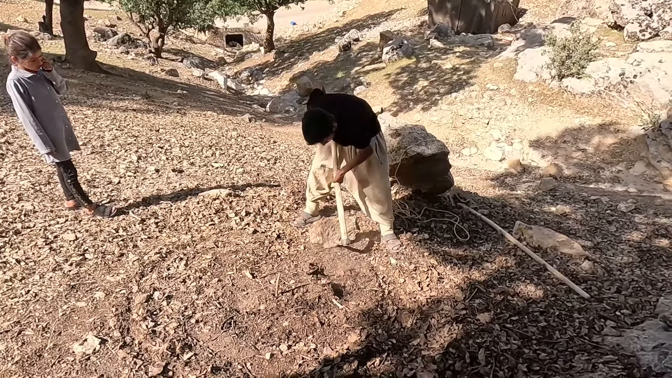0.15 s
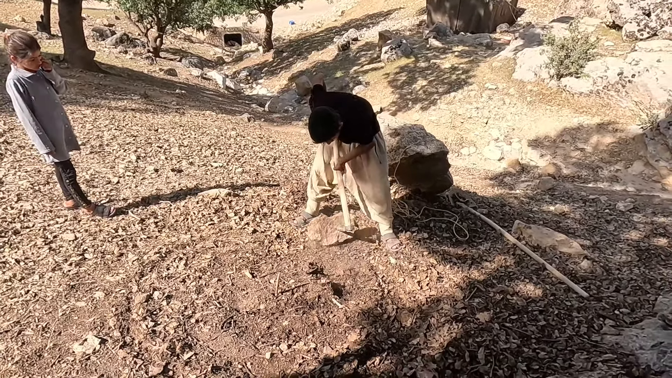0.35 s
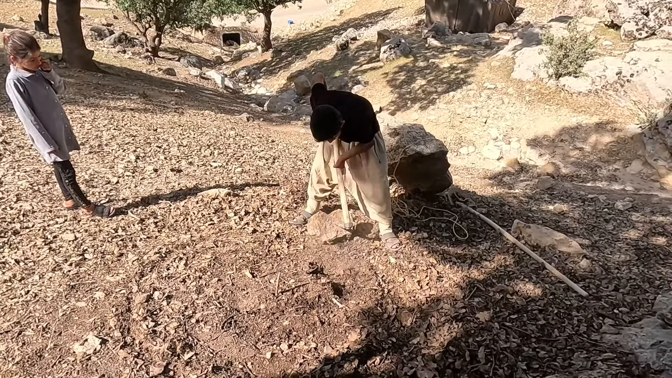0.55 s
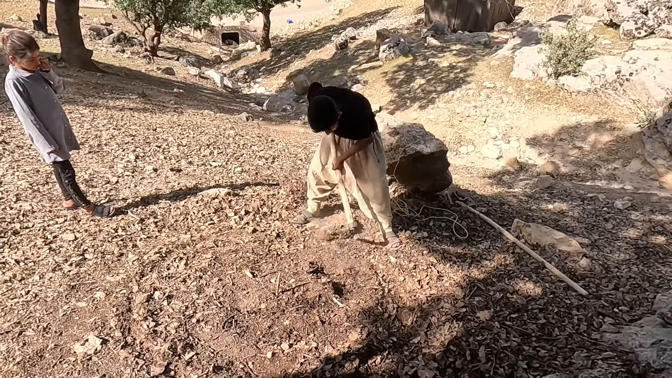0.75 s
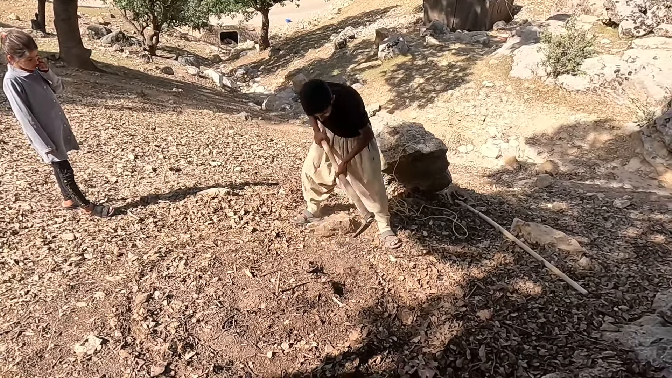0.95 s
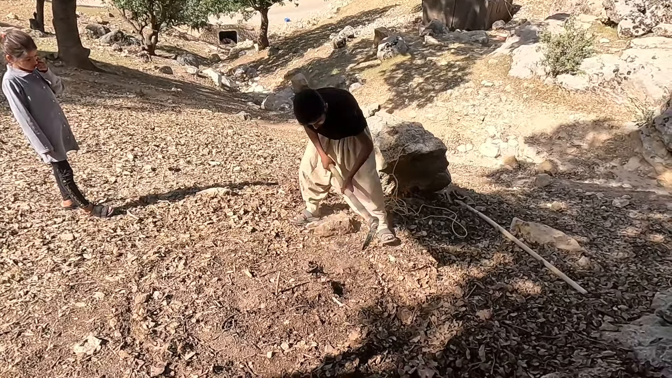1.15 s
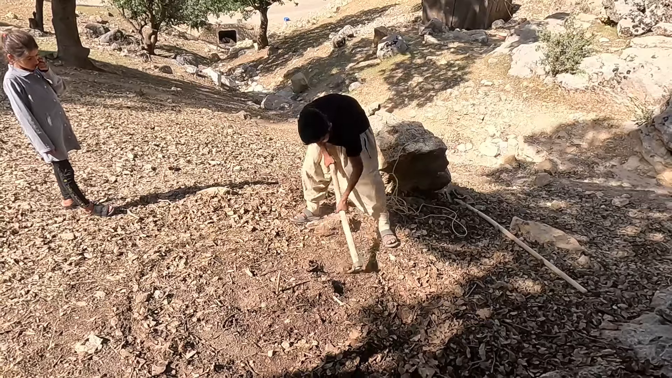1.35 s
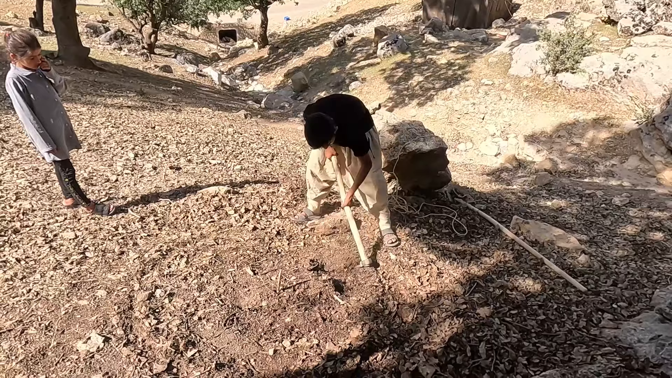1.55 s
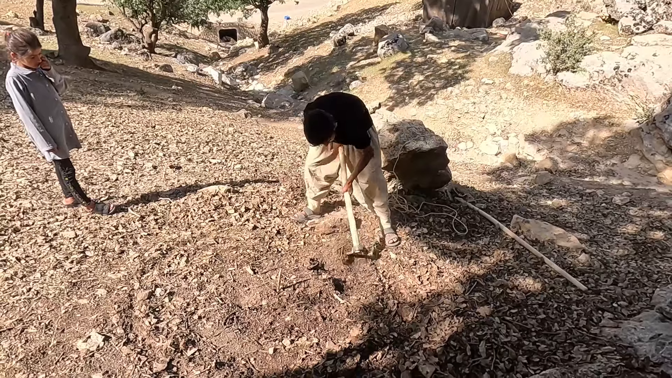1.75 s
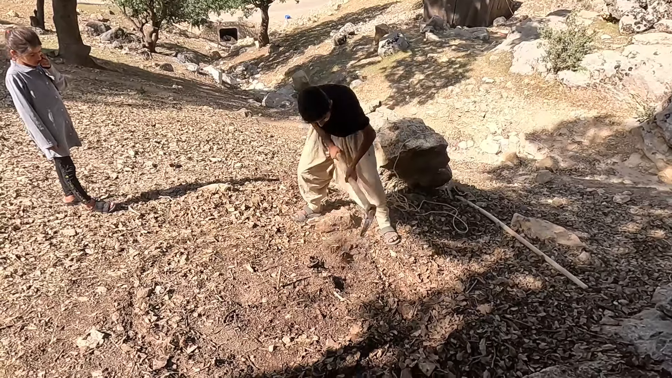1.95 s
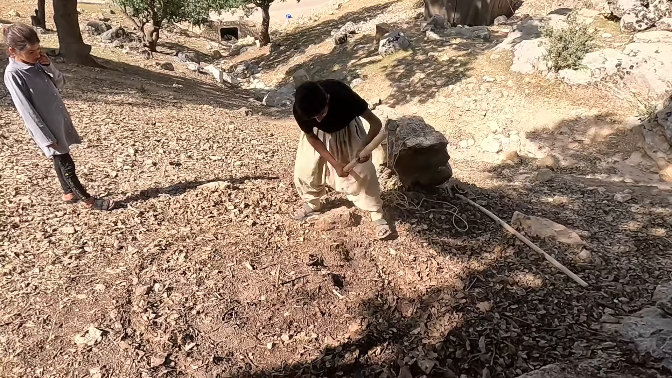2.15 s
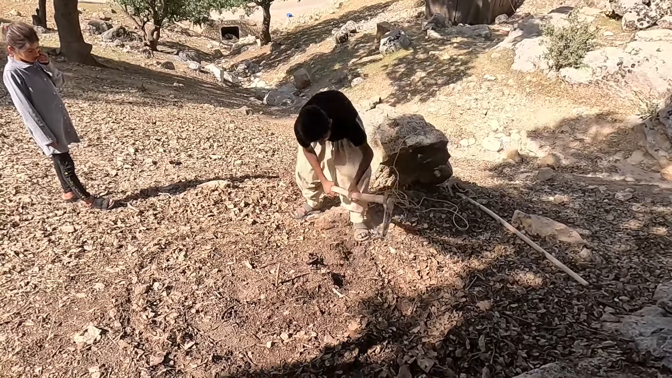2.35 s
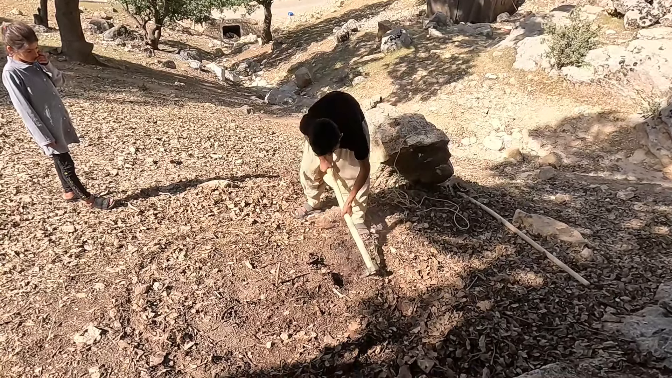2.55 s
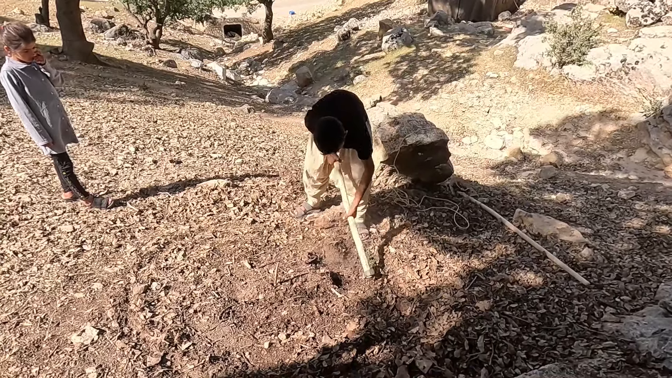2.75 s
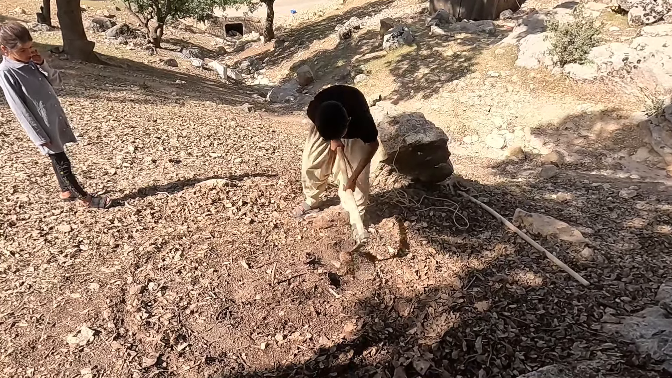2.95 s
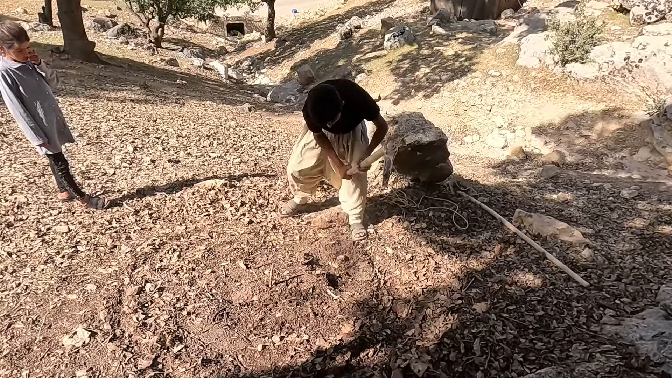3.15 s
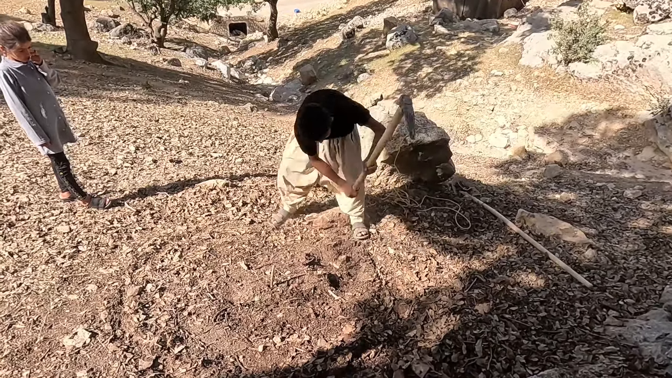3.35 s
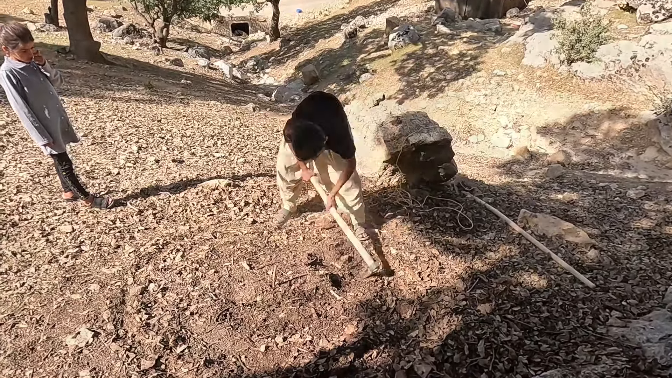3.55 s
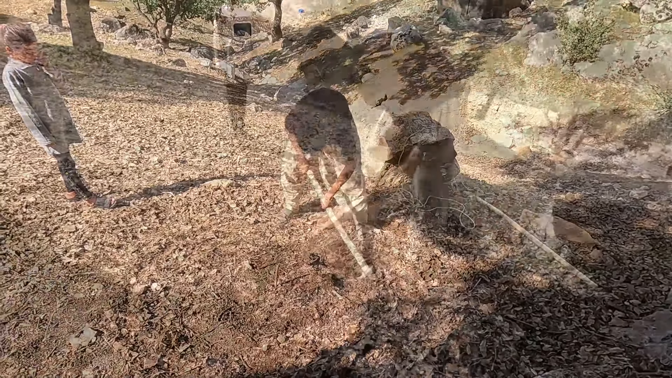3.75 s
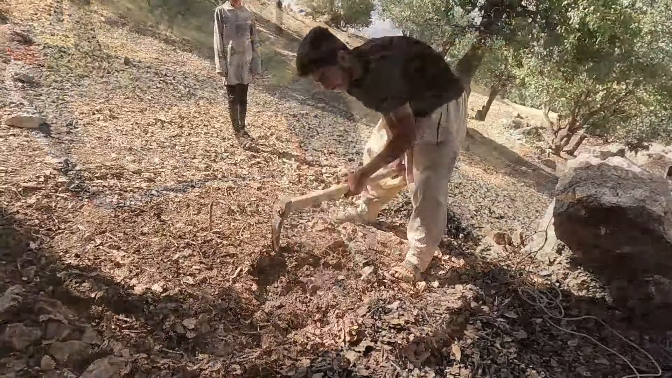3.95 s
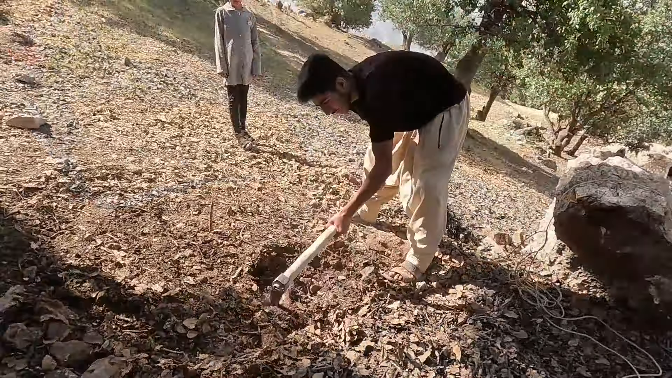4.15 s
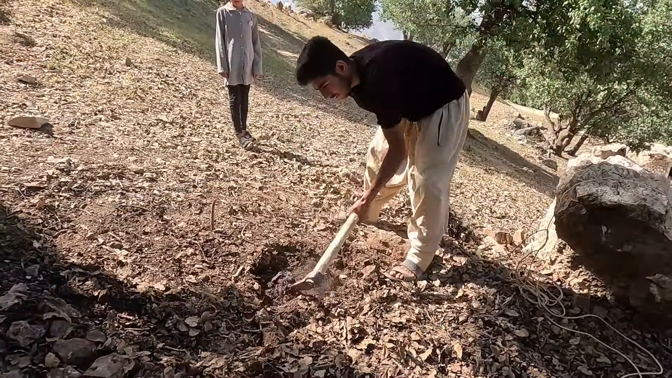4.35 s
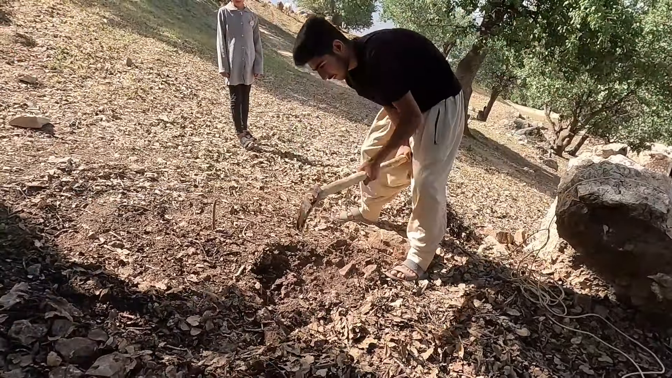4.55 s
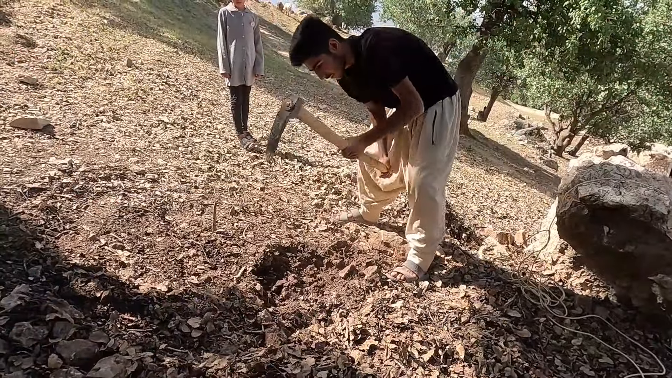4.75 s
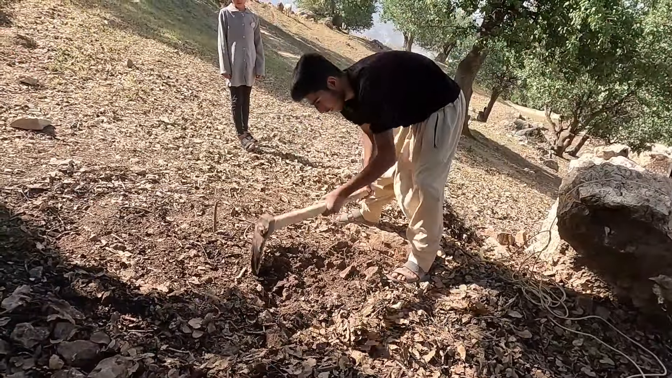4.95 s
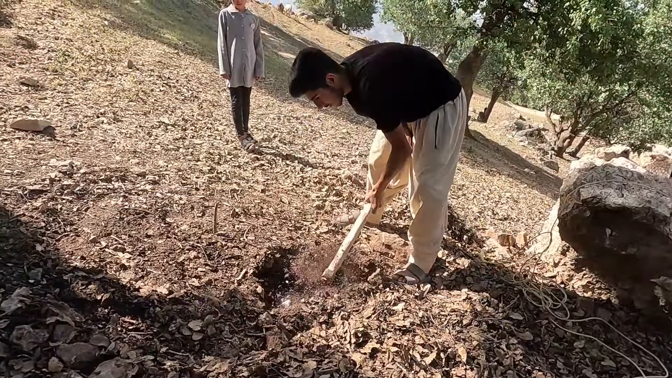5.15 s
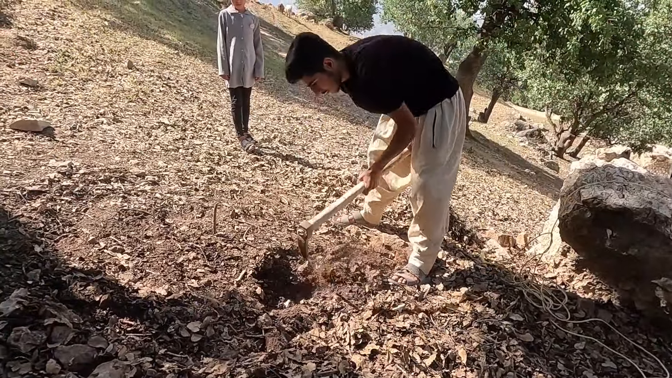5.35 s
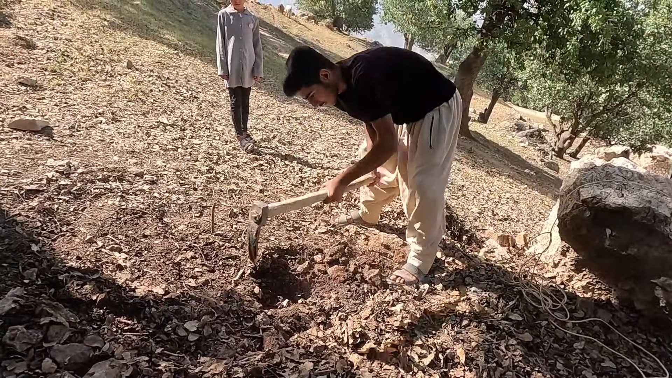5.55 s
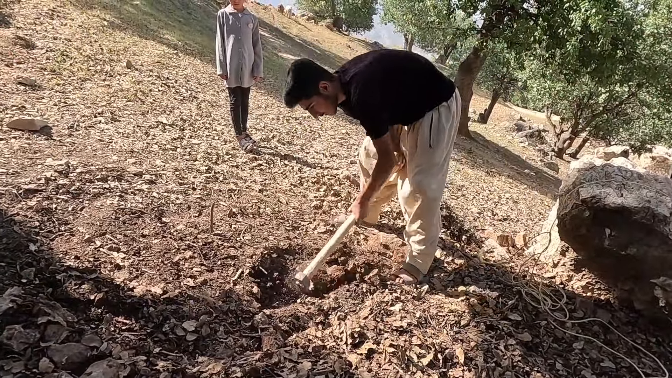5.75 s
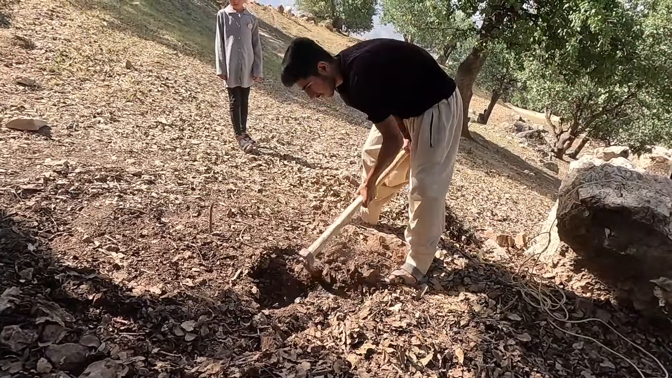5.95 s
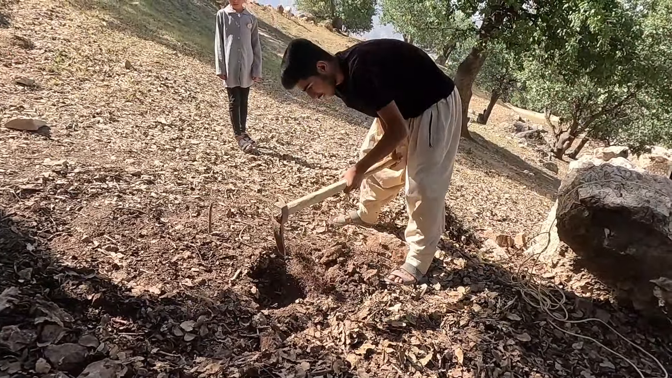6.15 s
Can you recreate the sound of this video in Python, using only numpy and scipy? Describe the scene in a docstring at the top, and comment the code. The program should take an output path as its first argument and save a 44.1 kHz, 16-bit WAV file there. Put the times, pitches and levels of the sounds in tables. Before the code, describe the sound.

Outdoors on a dry slope, a mattock bites stony soil a few steps away. Each of seven blows, about a second apart, gives a brief graze, a crunch, a hard stone knock and a dull thump. Between them feet shuffle through dead leaves, crumbs trickle and metal clinks faintly. Later blows are crunchier, with clattering jolts; a far bird whistles upward near the end. Close stereo pickup, thin hillside echo.

```python
"""On an open hillside a mattock digs dry, stony soil a few steps away.
In each blow the blade grazes, bites, knocks a buried stone and thumps the ground; earth trickles after it.
Random clicks through filters make soil and dead leaves; damped sines make stones, metal and thumps.
Between blows the blade jolts against clods, feet shuffle and metal clinks faintly.
The slope's echo is a decaying noise tail; a far bird's upward whistle is a gliding sine."""
import sys
import numpy as np
from scipy import signal
from scipy.fft import rfft, irfft, next_fast_len
from scipy.io import wavfile

SR = 44100
rng = np.random.default_rng(int(sys.argv[2]) if len(sys.argv) > 2 else 0)


def to_wav(s):
    """Save 16-bit WAV."""
    ch = np.atleast_2d(s).T  # columns
    pcm = np.round(np.clip(ch, -1, 1) * 32767)  # PCM
    wavfile.write(sys.argv[1], SR, pcm.astype(np.int16))


N = 272979
T = np.arange(N) / SR

# Faint rustle underneath. Each row: time in seconds, level of the leaves in dB.
STIR = [(0, -59.5), (1.2, -64), (3.6, -65), (4.15, -70), (4.95, -75.5), (5.7, -62), (6.19, -62)]
# Feet and blade drag through loose ground.
# Each row: start in seconds, length in seconds, level of sliding earth in dB, of dry leaves in dB.
SHUFFLES = [(-.1, 0.4028, -53.5, -54), (0.663, 0.5181, -59, -56.5), (1.851, 0.27117, -51, -54),
            (2.04, 0.4306, -64, -56), (2.601, 0.42475, -64, -55.5), (2.975, 0.80035, -54, -52.5),
            (3.663, 0.28, -67, -61.5), (4.375, 0.28902, -60.5, -52.5), (5.145, 0.52542, -56, -52.5),
            (6.035, 0.4948, -64, -53.5)]
# Spectral shapes of sliding earth, dry leaves and moving air.
# Each row: frequency in Hz, relative density in dB per Hz.
EARTH_SPECTRUM = [(200, -3.5), (600, -22.5), (1200, 0), (2000, -2), (3800, -2.5), (5500, -4.5),
                  (12000, -38.5)]
LEAF_SPECTRUM = [(1500, -21.5), (3500, -4.5), (5000, -5.5), (7600, 1.5), (9000, -10), (11000, -16),
                 (12500, -10.5), (15500, -52.5)]
AIR_SPECTRUM = [(20, 9), (45, 7), (80, -20), (180, -6.5), (350, -15), (900, -25.5), (3000, -61)]
# The loudest pebble drops and leaf snaps.
# Each row: start in seconds, peak level in dB before a common trim, pitch in Hz.
TICKS = [(.035, -26, 7850), (0.0655, -24, 4658), (0.1997, -25.5, 2380), (1.1164, -36, 3860),
         (2.1217, -27.5, 3100), (2.137, -21.5, 7740), (3.0851, -29, 1716), (3.4576, -20.5, 4900),
         (3.5722, -24.5, 3800), (4.013, -41.5, 3360), (4.362, -26, 2330), (4.549, -27, 5034),
         (6.119, -27.5, 7640)]
# Feet and clods land softly. Each row: start in seconds, level of the lower mode in dB.
FOOTFALLS = [(0.147, -41.5), (.222, -39), (.881, -39), (1.581, -36), (1.76, -46.5), (1.849, -46.5),
             (1.945, -47), (4.303, -26.5), (6.052, -46.5)]
# Full blows. Each row: bite in seconds, decay in seconds, crunch in dB, crack in dB, grit in dB,
# lead of the graze over the bite in seconds, graze in dB, delay of the thump after the bite in seconds,
# thump in dB, thump in Hz, upper thump in dB, trickle in dB.
BLOWS = [(0.3018, 0.00446, -22, -23, -33, 0.013795, -51.5, 0.002982, -28, 119, -20.5, -55.5),
         (1.449, 0.00276, -30, -21.5, -46.5, 0.01318, -37.5, 0.0035836, -21.5, 87.7, -19.5, -57),
         (2.528, 0.003692, -29.5, -28.5, -42, 0.010011, -30, 0.0023692, -26, 99.31, -21, -52.5),
         (3.6487, .0028, -39.5, -24.5, -37.5, 0.0067826, -32.5, 0.0036536, -26.5, 96, -28, -52.5),
         (4.228, 0.0034, -24.5, -30, -58.5, 0.0097, -29, .007, -19, 122, -25, -52.5),
         (5.0928, 0.00604, -17.5, -26.5, -31, 0.0066, -41.5, 0.008432, -19.5, 154.6, -23.5, -33.5),
         (5.7563, 0.010004, -19.5, -21.5, -28, 0.012292, -43.5, 0.003261, -21.5, 97.74, -28, -49)]
# The blade jolts against clods and pebbles. Each row: start in seconds, swell in seconds, decay in seconds,
# crunch in dB, crack in dB, grit in dB, pebble in Hz, pebble in dB before the contact softens it.
JOLTS = [(.375, 0.00227, 0.00835, -31.5, -60, -58.5, 914.3, -30),
         (0.412, 0.001992, 0.01112, -36.5, -52, -68.5, 1201, -21.5),
         (0.878, 0.0008195, 0.001976, -31.5, -56, -52, 1454, -51),
         (1.581, 0.00202, 0.008404, -41, -51, -54.5, 1300, -41.5),
         (4.259, 0.001521, 0.0165, -45.5, -42, -47.5, 7627, -20),
         (4.2994, 0.004, 0.003536, -24.5, -33, -49.5, 1318, -16.5),
         (5.141, 0.004084, 0.01235, -31, -37, -44.5, 1518, -25),
         (5.1608, 0.0011204, 0.011, -31.5, -38, -54, 7507, -18.5),
         (5.169, 0.0017765, 0.005102, -24, -42, -53.5, 1209, -16.5),
         (5.7948, 0.001034, .003, -40.5, -55.5, -57.5, 1159, -30),
         (5.8421, 0.0005582, 0.00225, -44.5, -38, -53.5, 2512, -31.5),
         (5.8661, 0.0034476, 0.002432, -37, -25.5, -52.5, 3132, -21),
         (5.883, .001, 0.003485, -44.5, -39, -49, 6222, -34.5)]
# Spectral shapes of three kinds of fracture. Each row: frequency in Hz, relative density in dB per Hz.
CRUNCH_SPECTRUM = [(80, -14.5), (250, 0.5), (520, -12), (800, -4), (1200, 1.5), (1850, 1.5), (2400, -11),
                   (5000, -44.5)]
CRACK_SPECTRUM = [(900, -31.5), (1900, -10.5), (2500, -4), (4100, -7.5), (5000, -16), (9000, -32)]
GRIT_SPECTRUM = [(2500, -31.5), (4800, 0.5), (7800, 5), (9200, -6), (12000, -30.5), (16000, -34.5)]
# Modes of head and handle. Each row: frequency in Hz, relative level in dB, 60 dB decay in seconds.
TOOL_MODES = [(780, 4, 0.049), (957.56, -0.5, 0.06), (1155.9, -3.5, 0.034), (1452, -2.5, 0.1),
              (1914, 7, .035), (2410.7, 11, 0.033), (3320, 3.5, 0.074), (3820, -6.5, .025),
              (6055.1, 10, 0.026), (8131, -7.5, 0.023)]
# The stone that each blow meets, in the order of the blows. Each row: cycles to decay by 60 dB,
# three modes of (frequency in Hz, level in dB before the contact softens it).
STONES = [(50, [(970, -20.5), (1427, -11.5), (2700, -26.5)]), (29.95, [(1337, -24), (2640, -9.5),
          (4125, -2)]), (48, [(1428, -13.5), (2020, -25.5), (2506, -10.5)]), (65, [(2050, -28.5),
          (2453, -20), (3900, -5)]), (42.47, [(1170, -19.5), (1310, -14), (3230, -15.5)]), (48, [(954, -33),
          (1575, -16), (1903, -13)]), (50, [(1283, -16.5), (1912, -8.5), (3880, -10.5)])]
# The blade comes free and rings. Each row: start in seconds, level in dB added to the modes of the blade.
BLADE_RINGS = [(4.2241, 1), (4.259, -4.5), (4.467, -13)]
# Modes of the free blade. Each row: frequency in Hz, base level in dB, 60 dB decay in seconds.
BLADE_MODES = [(1195.9, -29, .16), (3314, -31.5, .07), (4585.2, -33.5, .08), (7781.5, -31.5, .05)]
# Crumbs spill over soil and leaves.
# Each row: start in seconds, length in seconds, rms level in dB, brightest frequency in Hz.
SPILLS = [(0.31, 0.10473, -47.5, 2297), (0.863, 0.07634, -43.5, 5479), (0.922, .1, -52, 5074),
          (1.478, .19, -59, 3365), (2.41, 0.1129, -46, 6241), (2.879, 0.04878, -56, 4530),
          (3.321, 0.093, -46, 5559), (5.782, 0.15164, -45, 3311)]
# Stones and blade slide on each other.
# Each row: start in seconds, length in seconds, rms level in dB, resonance in Hz.
SCRAPES = [(.525, .02, -54, 1309), (0.562, 0.03819, -54, 1797), (2.548, 0.092, -58.5, 1461),
           (2.889, 0.3137, -61.5, 1730), (2.904, 0.3366, -63, 3701), (3.673, .14, -61.5, 2070),
           (4.444, 0.03784, -52.5, 1343), (4.695, 0.014502, -56.5, 465)]
# Light touches on metal.
# Each row: start in seconds, level in dB added to the modes, brightness in dB per octave above 2 kHz.
TOUCHES = [(1.9035, 1, 1), (2.167, -13, 3.5)]
# Modes of the clinking metal. Each row: frequency in Hz, base level in dB, 60 dB decay in seconds.
CLINK_MODES = [(900.2, -70, 15), (1490.5, -59, 2.68), (1625.8, -53, 0.74), (1904.5, -42.5, 0.16),
               (2259.7, -47.5, 0.73), (3092.5, -55.5, 0.79), (3348.8, -45, 0.2521), (4614, -54.5, .3),
               (5042.8, -44.5, 0.24), (5802, -59.5, 0.3724), (6455.8, -48, 0.19)]
# Bird calls. Each row: top of the whistle in seconds, level in dB added to the glide.
WHISTLES = [(5.041, -50), (5.32, -43.5), (5.601, -43), (6.17, -42)]
# Course of one whistle. Each row: time from the top in seconds, mean pitch in Hz, relative level in dB.
GLIDE = [(-.135, 1191, -20), (-.11, 1293, -18), (-.075, 1480, -10.5), (-.04, 1920, -11.5),
         (-.015, 2135, -5), (0, 2363, -3.5), (.025, 2238, -11)]
# Treble response of the microphone. Each row: frequency in Hz, gain in dB.
MICROPHONE = [(8000, 0), (11000, -6), (13000, -14.5), (15500, -13)]
# The two microphone ports.
# Each row: frequency in Hz, left minus right in dB, phase by which left leads in radians.
PORTS = [(100, -1.1, 0), (1000, -1.8, -.2), (1900, -2, -.62), (2900, -3.6, -.75), (3900, 0, -.3),
         (4600, 2, -.35), (5600, -1.2, -.45), (7500, .6, -.15), (8700, 5, -.1), (9600, 10, -2.4),
         (11000, -1, 0), (15000, -4, -1.5)]

STIR_EARTH_DB, TRICKLE_DECAY_S = -0.5, 0.049   # earth relative to leaves; run-off after a blow
AIR_DB, SWING_AIR_DB, SWING_S = -64, 5, 0.067   # base level, rise at a swing, half-width of the rise
HILL_HOLD_S, HILL_T60_S, HILL_DB = .12, 0.66, -21.5   # even scattering, then decay; level of digging sent
FOOT_HZ, FOOT_T60_S, FOOT_UPPER_DB = 81.48, 0.078, -14   # upper mode relative to lower
THUMP_T60_S, UPPER_THUMP_HZ, UPPER_THUMP_T60_S = .085, 230.34, .054
GRAZE_SWELL_S, GRAZE_DECAY_S = 0.005, 0.012
GRAZE_CRACK_DB, GRAZE_GRIT_DB = -4.5, -5   # relative to the crunch of the graze
BITE_SWELL_S, STONE_AFTER_S = .0015, 0.0027   # the stone sounds this long after the bite begins
PEBBLE_CYCLES = 45.99   # a loose pebble decays by 60 dB in this many cycles
CUTOFF_HZ = 16500


def from_db(db):
    """Logarithmic level: decibels become an amplitude gain."""
    return 10 ** (np.asarray(db) / 20)


def rms_one(x):
    """Power normalisation: scale to rms 1."""
    return x / np.sqrt(np.mean(x ** 2) + 1e-20)


def ten_ms(x):
    """Energy normalisation: scale to the energy of 10 ms at rms 1."""
    return rms_one(x) * np.sqrt(SR / 100 / len(x))


def colour(x, points):
    """Minimum-phase filtering: a folded cepstrum gives the drawn spectrum a causal response."""
    size = next_fast_len(x.shape[-1] // 2 + 2048) * 2
    hz, db = np.transpose(points)
    bins = np.arange(size // 2 + 1) * SR / size
    log_gain = np.log(from_db(np.interp(np.log(bins + 1), np.log(hz), db)))
    cepstrum = irfft(log_gain)
    cepstrum[1:size // 2] *= 2
    cepstrum[size // 2 + 1:] = 0
    response = np.exp(rfft(cepstrum))
    return irfft(rfft(x, size) * response)[..., :x.shape[-1]]


def ring(x, hz, t60):
    """Damped resonance: a unit click sets a decaying sine of initial height 1 ringing."""
    radius = from_db(-60 / (t60 * SR))
    angle = 2 * np.pi * hz / SR
    feedback = [1, -2 * radius * np.cos(angle), radius * radius]
    return signal.lfilter([0, np.sin(angle)], feedback, x + 1e-18)


def add(track, s, sound):
    """Superposition: mix a sound in at time s."""
    i = int(s * SR)
    track[i:i + len(sound)] += sound[:N - i]


def grains(per_s, spread_db, size):
    """Random impacts: clicks of either sign, with levels spread exponentially in dB."""
    strength = from_db(spread_db * np.minimum(rng.exponential(1, size), 5))
    return (rng.random(size) < per_s / SR) * strength * rng.choice([-1, 1], size)


def drift(rate, size=N):
    """Slow random modulation: straight lines join normal random knots, rate of them a second."""
    knots = rng.standard_normal(size // 40)
    return np.interp(T[:size] * rate, np.arange(len(knots)), knots)


def stroke(length):
    """Sliding envelope: a quick rise and a slower fall."""
    return np.sin(np.pi * np.linspace(0, 1, int(length * SR)) ** 0.79)


def rustle_levels(skew=0.7892):
    """Addition of power: gains of earth and leaves join the stir, each shuffle and each dying trickle."""
    stir_s, stir_db = np.transpose(STIR)
    stir_db = np.interp(T, stir_s, stir_db)
    earth, leaves = from_db(stir_db + STIR_EARTH_DB), from_db(stir_db)
    for s, length, earth_db, leaves_db in SHUFFLES:
        drag = np.sin(np.pi * np.clip((T - s) / length, 0, 1) ** skew)
        earth = np.hypot(earth, from_db(earth_db) * drag)
        leaves = np.hypot(leaves, from_db(leaves_db) * drag)
    for s, *_, trickle_db in BLOWS:
        trickle = (T > s) * np.exp(-np.abs(T - s) / TRICKLE_DECAY_S)
        earth = np.hypot(earth, from_db(trickle_db) * trickle)
    return earth, leaves


def grain_bed(spectrum, per_s, spread_db, bed_db, clump_db, side_db):
    """Granular noise: clumped clicks over steady noise, filtered, with a weaker left-right difference."""
    def layer():
        clumps = from_db(clump_db * np.tanh(drift(76)))
        crackle = rms_one(grains(per_s, spread_db, N) * clumps)
        bed = from_db(bed_db) * rng.standard_normal(N)
        return rms_one(colour(crackle + bed, spectrum))
    mid, side = layer(), layer()
    return mid + from_db(side_db) * side * [[1], [-1]]


def air_level(gust_db=6.0):
    """Amplitude modulation: the gain of the low rumble wanders, and swells round each swing."""
    swing = sum(np.exp(-((T - s) / SWING_S) ** 2) for s, *_ in BLOWS)
    return from_db(AIR_DB + SWING_AIR_DB * swing + gust_db * drift(10))


def crumbs(gain, per_s=22, spread_db=2.5, crumb_db=19):
    """Sparse impacts: single crumbs drop here and there, louder while the leaves are stirred."""
    drops = grains(per_s, spread_db, N) * gain * from_db(crumb_db)
    return colour(drops, [(300, -17), (1200, -5.5), (3500, -1.5), (5000, -2.5), (7500, 3.5),
                          (9500, -9), (15000, -16)])


def near_ground(x, scatter_db=-19, scatter_s=0.0037):
    """Near scattering: rough ground adds a short tail of opposite sign to left and right."""
    t = T[:SR // 30]
    scatter = rms_one(rng.standard_normal(len(t)) * np.exp(-t / scatter_s)) / np.sqrt(len(t))
    return x + from_db(scatter_db) * signal.fftconvolve(x, scatter)[:N] * [[1], [-1]]


def ticks(tick_db=-4.5, decay_s=0.0018, ring_t60=0.0038):
    """Heavily damped impact: tiny dry noise snaps, each with a trace of pitch."""
    out, t = np.zeros(N), T[:SR // 20]
    for s, db, hz in TICKS:
        burst = rng.standard_normal(len(t)) * np.exp(-t / decay_s)
        burst = colour(burst, [(300, -12.0), (1500, 1.5), (7500, 7.5), (10000, -9.0), (15000, -12.5)])
        snap = rms_one(burst)
        snap = snap + .5 * rms_one(ring(snap, hz, ring_t60))
        add(out, s, from_db(db + tick_db) * snap / np.abs(snap).max())
    return out


def hillside(x, side_db=-5):
    """Diffuse reflection: rocks and trees scatter a thin tail that holds briefly and fades."""
    t = T[:SR]
    fade = from_db(-60 * np.maximum(t - HILL_HOLD_S, 0) / HILL_T60_S)
    rise = 1 - np.exp(-t / 0.012)
    mid, side = rng.standard_normal((2, len(t))) * fade * rise
    tail = colour(mid + from_db(side_db) * side * [[1], [-1]],
                  [(100, -4.5), (500, -17.5), (1300, -2.5), (2200, -1.5), (4000, -1), (6000, -6.0),
                   (12000, -11.5)])
    return signal.fftconvolve(x[None], rms_one(tail) / np.sqrt(len(t)) / 2, axes=1)[:, :N]


def thump(db, hz, t60, upper_db, settle_db=-13, settle_s=0.042):
    """Damped modes of the ground: it bounces in two, then clods settle with a low shudder."""
    t = T[:SR // 2]
    push = signal.unit_impulse(len(t))
    settle = rms_one(colour(rng.standard_normal(len(t)),
                            [(25, -1.5), (80, -5.5), (230, -7.5), (450, -25.5), (1500, -56.5)]))
    lower = from_db(db) * ring(push, hz, t60)
    upper = from_db(upper_db) * ring(push, UPPER_THUMP_HZ, UPPER_THUMP_T60_S)
    return lower - upper + from_db(db + settle_db) * settle * np.exp(-t / settle_s)


def thumps():
    """Impulse response of the ground: it takes each blow just after the bite, and each footfall."""
    out = np.zeros(N)
    for s, *_, delay, db, hz, upper_db, _trickle_db in BLOWS:
        add(out, s + delay, thump(db, hz, THUMP_T60_S, upper_db))
    for s, db in FOOTFALLS:
        add(out, s, thump(db, FOOT_HZ, FOOT_T60_S, db + FOOT_UPPER_DB))
    return out


def fracture(swell, decay, crunch_db, crack_db, grit_db,
             modes_db=-13.5, crumble_db=-27, crumble_s=0.016, clods_db=16.0):
    """Brittle fracture: breaks swell and die as the blade presses, clods crumble; all ring the tool."""
    t = T[:SR // 8]
    after = np.maximum(t - swell, 0)
    clods = from_db(clods_db * np.tanh(drift(220, len(t))))
    crumble = from_db(crumble_db) * clods * np.exp(-after / crumble_s)
    force = np.minimum(t / swell, 1) ** 2 * (np.exp(-after / decay) + crumble)
    soil = np.zeros(len(t))
    for db, shape in ((crunch_db, CRUNCH_SPECTRUM), (crack_db, CRACK_SPECTRUM), (grit_db, GRIT_SPECTRUM)):
        soil += from_db(db) * ten_ms(colour(force * grains(14000, 3.9, len(t)), shape))
    # neighbouring modes take opposite signs
    tool = sum((-1) ** k * from_db(db) * ring(soil, hz, t60) for k, (hz, db, t60) in enumerate(TOOL_MODES))
    return np.std(soil) * rms_one(rms_one(soil) + from_db(modes_db) * rms_one(tool))


def blows():
    """Successive fractures: a full blow grazes the surface and then bites; a jolt is one fracture."""
    out = np.zeros(N)
    for s, decay, crunch_db, crack_db, grit_db, lead, graze_db, *_ in BLOWS:
        graze = fracture(GRAZE_SWELL_S, GRAZE_DECAY_S, graze_db,
                         graze_db + GRAZE_CRACK_DB, graze_db + GRAZE_GRIT_DB)
        add(out, s - lead, graze)
        add(out, s, fracture(BITE_SWELL_S, decay, crunch_db, crack_db, grit_db))
    for s, swell, decay, crunch_db, crack_db, grit_db, *_ in JOLTS:
        add(out, s, fracture(swell, decay, crunch_db, crack_db, grit_db))
    return out


def knocks():
    """Modes under a soft contact: dust rounds the push that rings stones, pebbles and the free blade."""
    out = np.zeros(N)
    contact = np.pad(np.hanning(6) / np.hanning(6).sum(), (0, SR // 4))
    for (s, *_), (cycles, modes) in zip(BLOWS, STONES):
        for hz, db in modes:
            add(out, s + STONE_AFTER_S, from_db(db) * ring(contact, hz, cycles / hz))
    for s, swell, *_, hz, db in JOLTS:
        add(out, s + swell, from_db(db) * ring(contact, hz, PEBBLE_CYCLES / hz))
    for s, db in BLADE_RINGS:
        add(out, s, sum(from_db(db + mode_db) * ring(contact, hz, t60) for hz, mode_db, t60 in BLADE_MODES))
    return out


def spills(width=2.6, skirt_db=-7, clump_db=4.0, spread_db=3.0):
    """Granular flow: clumps of crumbs shower over dead leaves; coarser crumbs sound lower."""
    out = np.zeros(N)
    for s, length, db, hz in SPILLS:
        flow = stroke(length)
        flow = flow * from_db(clump_db * np.tanh(drift(83, len(flow))))
        shape = [(hz / 12, -22), (hz / width ** 2, skirt_db - 0.5), (hz / width, -3), (hz, 0),
                 (hz * 1.3, 0), (hz * 2.3, -15), (hz * 4, -32)]
        shower = colour(flow * grains(5000, spread_db, len(flow)), shape)
        add(out, s, from_db(db) * rms_one(shower))
    return out


def scrapes(cycles=12):
    """Stick-slip friction: dense slips ring one broad resonance under a quick stroke."""
    out = np.zeros(N)
    for s, length, db, hz in SCRAPES:
        push = stroke(length)
        slips = push * grains(6700, 6.5, len(push))
        add(out, s, from_db(db) * rms_one(ring(slips, hz, cycles / hz)))
    return out


def clink():
    """Modal excitation: metal is touched, the second time nearer its edge; the lowest mode lingers."""
    out, push = np.zeros(N), signal.unit_impulse(SR * 2)
    for s, touch_db, bright_db in TOUCHES:
        for hz, db, t60 in CLINK_MODES:
            tilt_db = bright_db * np.log2(hz / 2000)
            add(out, s, from_db(db + touch_db + tilt_db) * ring(push, hz, t60))
    return out


def bird(flutter_db=4.5):
    """Frequency modulation: a thin whistle slides up an octave, hoarse from random pitch and level."""
    out = np.zeros(N)
    s, hz, db = np.transpose(GLIDE)
    t = np.arange(s[0], s[-1], 1 / SR)
    for top_s, level_db in WHISTLES:
        pitch = np.interp(t, s, hz) * (1 + .04 * drift(600, len(t)))
        level = from_db(level_db + np.interp(t, s, db) + flutter_db * drift(200, len(t)))
        add(out, top_s + s[0], level * np.sin(2 * np.pi * np.cumsum(pitch) / SR))
    return out


def scene(bird_echo_db=-5, knock_echo_db=-27):
    """Superposition of sources: the digger is straight ahead, with rustle all round his feet."""
    earth_gain, leaves_gain = rustle_levels()
    digging = blows() + thumps() + scrapes() + spills() + ticks() + clink()
    stones, whistle = knocks(), bird()
    earth = earth_gain * grain_bed(EARTH_SPECTRUM, per_s=5100, spread_db=3.5, bed_db=-3.0,
                                   clump_db=16.0, side_db=-9.5)
    leaves = leaves_gain * grain_bed(LEAF_SPECTRUM, per_s=1800, spread_db=5.0, bed_db=-0.5,
                                     clump_db=11.5, side_db=-12)
    air = air_level() * grain_bed(AIR_SPECTRUM, per_s=43, spread_db=-1.0, bed_db=8.5,
                                  clump_db=4.5, side_db=-2)
    echo = hillside(from_db(HILL_DB) * digging + from_db(knock_echo_db) * stones
                    + from_db(bird_echo_db) * whistle)
    near = near_ground(digging + stones + crumbs(leaves_gain))
    return near + whistle + earth + leaves + air + echo


def record(dry):
    """Two-port reception: ports differ in level and phase; peaks are clipped, then the top is cut."""
    size = next_fast_len(N + 4096)
    hz, db, phase = np.transpose(PORTS)
    bins = np.arange(size // 2 + 1) * SR / size
    # each port takes half of the difference
    half = from_db(np.interp(bins, hz, db) / 2) * np.exp(.5j * np.interp(bins, hz, phase))
    spectrum = rfft(colour(dry, MICROPHONE), size)
    ports = irfft(spectrum * np.array([half, 1 / half]), size)[:, :N]
    low_pass = signal.cheby2(14, 60, CUTOFF_HZ, fs=SR, output="sos")
    return signal.sosfilt(low_pass, np.clip(ports, -.95, .95))


dry = scene()
out = record(dry)
to_wav(out)
```